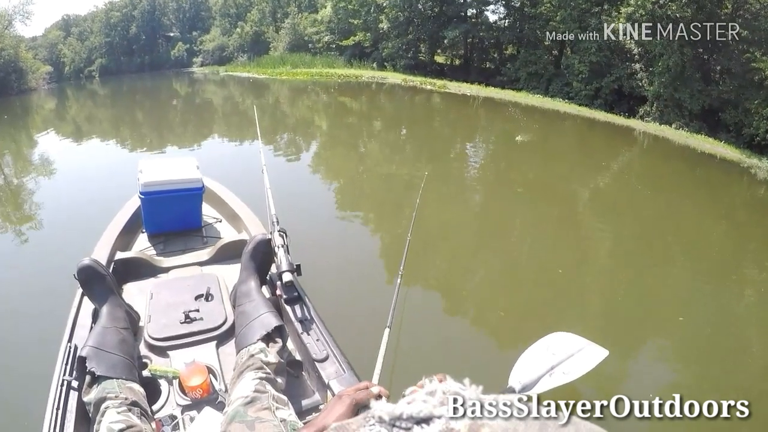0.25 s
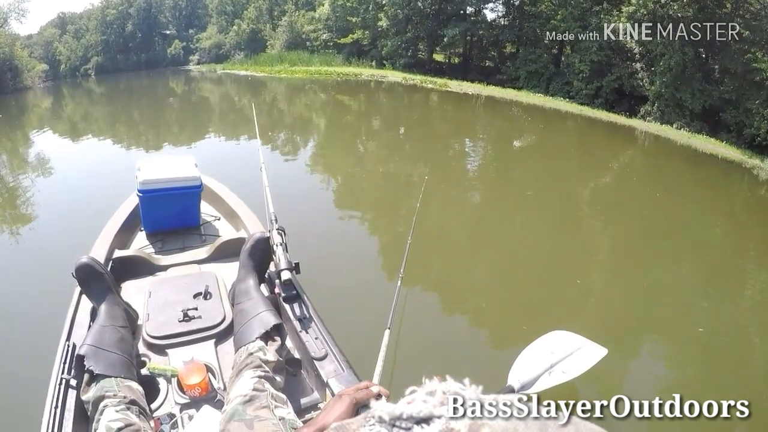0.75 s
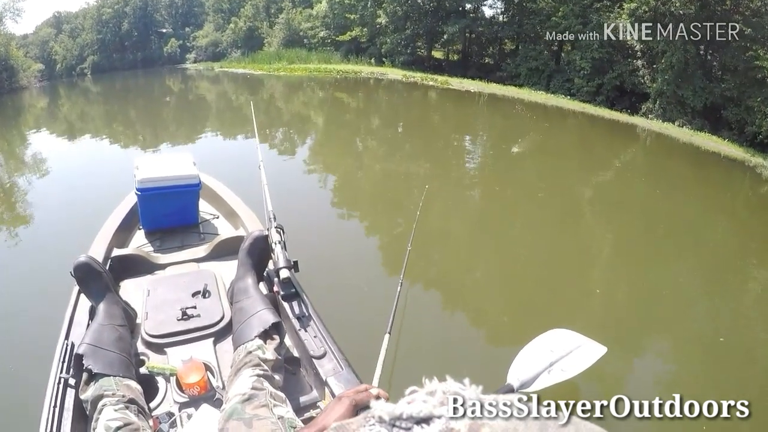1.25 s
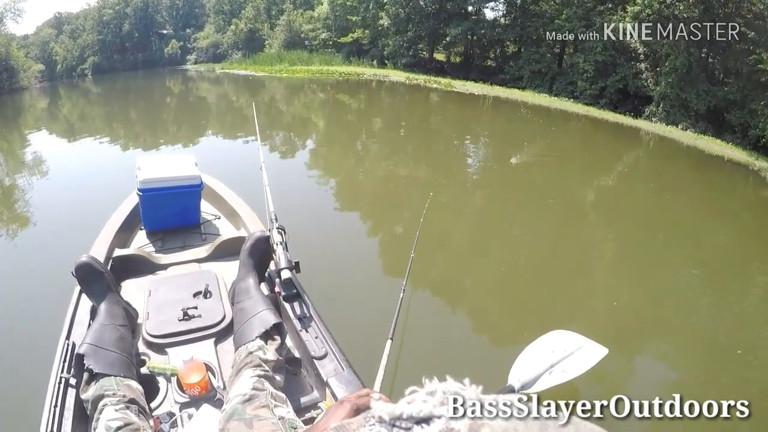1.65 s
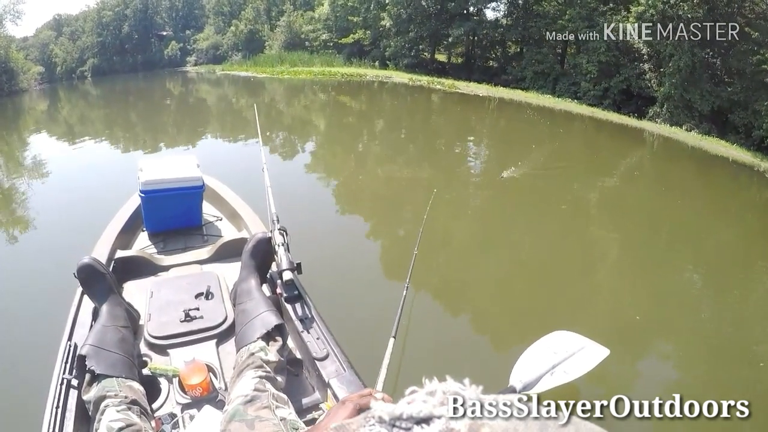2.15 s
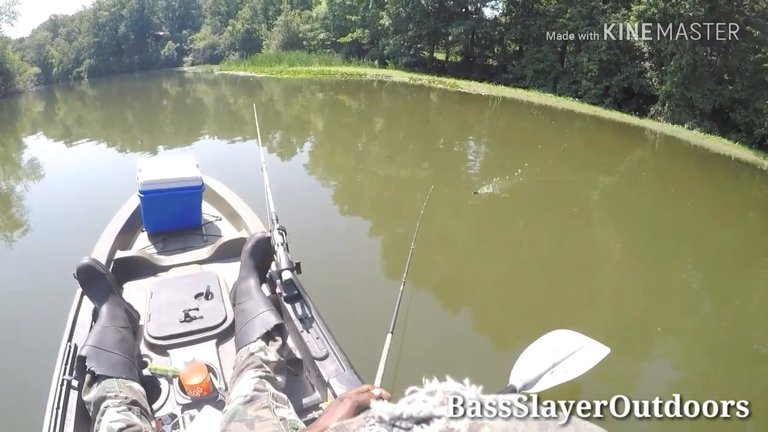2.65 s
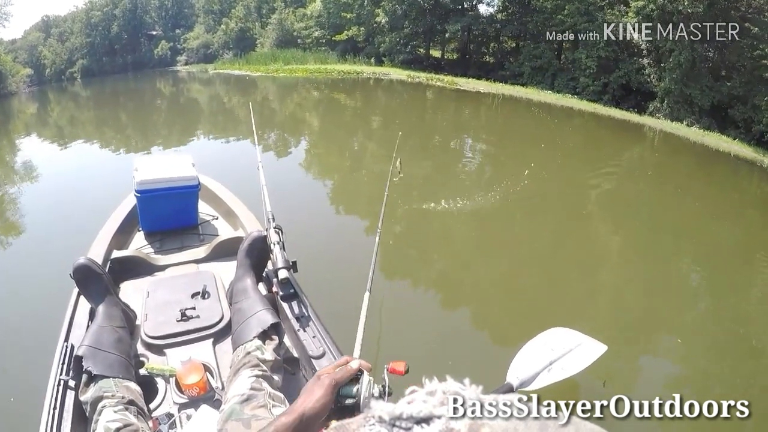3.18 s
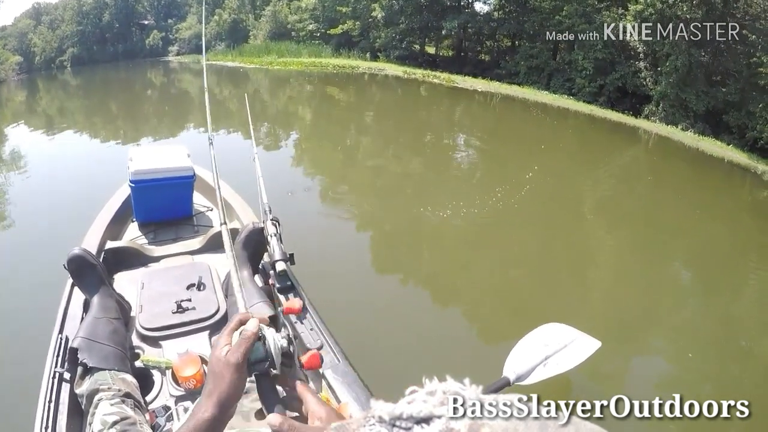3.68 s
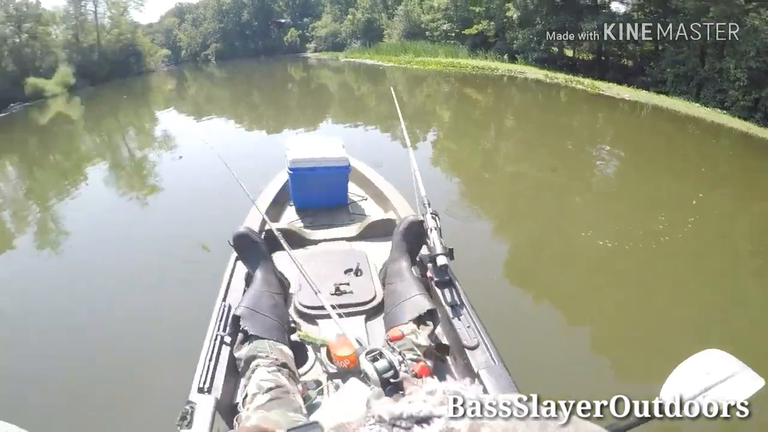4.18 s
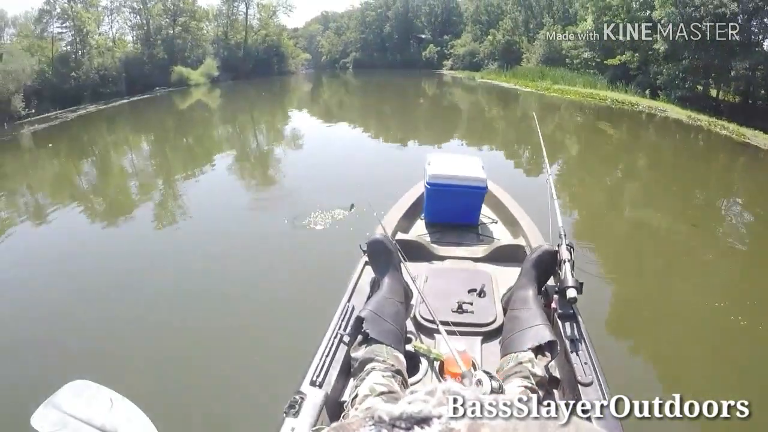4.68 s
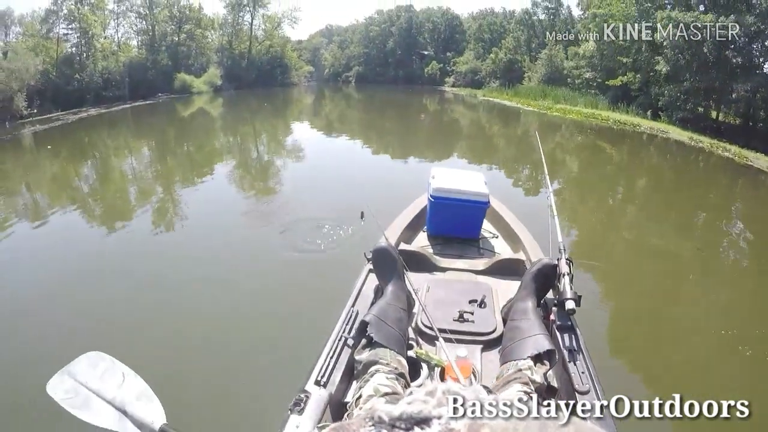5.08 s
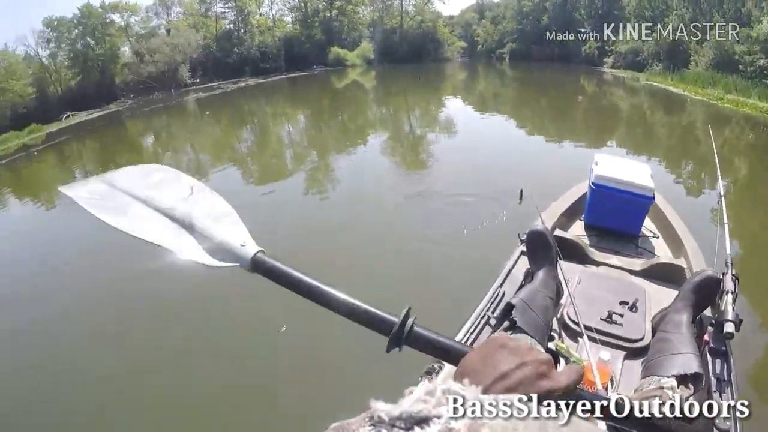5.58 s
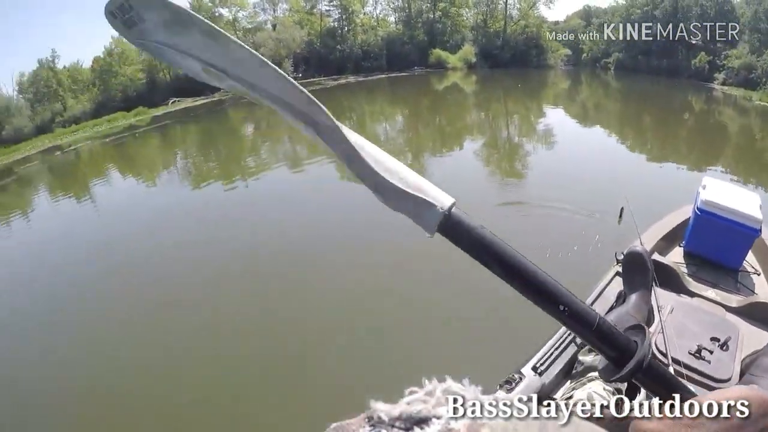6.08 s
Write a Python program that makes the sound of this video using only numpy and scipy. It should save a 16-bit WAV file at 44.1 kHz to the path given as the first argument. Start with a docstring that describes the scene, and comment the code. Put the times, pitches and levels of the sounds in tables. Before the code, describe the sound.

A propeller lure plops and sputters rapidly across calm water, then stops; tackle knocks on a plastic kayak and paddle drips patter over light wind rumble.

```python
"""A propeller lure is reeled across a river, close to one microphone on an angler's plastic kayak.
Each blade turn slaps the water (struck resonances, puffs of noise), throws up spray (tiny ringing bubbles)
and traps a bubble that plops upward in pitch. Then tackle and paddle knock and scrape on the hull, whose
modes ring, and drops patter. Cloth rustles in the seat, light wind rumbles on the microphone (coloured noise),
a small bird whistles on the bank (gliding sines), and insects and hiss lie far behind (steady noise)."""
import sys
import numpy as np
from scipy import signal
from scipy.fft import rfft, irfft
from scipy.io import wavfile

SR = 44100
rng = np.random.default_rng(int(sys.argv[2]) if len(sys.argv) > 2 else 0)


def voltage_ratio(decibels):
    """Convert decibels (scalar or array-like) to amplitude ratios, 20 dB per decade."""
    exponent = np.asarray(decibels, float) / 20
    return 10 ** exponent


def unload_wav(signal):
    """Save mono or channel-first audio to the path in sys.argv[1] as 16-bit WAV at rate SR, clipped to [-1, 1]."""
    wavfile.write(
        sys.argv[1],
        SR,
        np.round(np.clip(np.atleast_2d(signal).T, -1, 1) * 32767).astype(np.int16),
    )


N = 279153  # samples

# Far insects and hiss, their spectrum. Each row: frequency in Hz, relative density in dB per Hz.
AIR_SPECTRUM = [(1100, -28), (2300, -8), (3600, 0), (4400, -7.5), (8000, -10.5), (15500, -19.5)]
# Wind on the microphone. Each row: time in seconds, level in dB, flutter near 121 Hz in dB relative to it.
WIND_GUSTS = [(.45, -43.5, -8), (.75, -42.5, 3.5), (1.0, -43.5, 3), (1.4, -42, -6.5), (3.5, -46.5, -15),
              (4.5, -44, -9.5), (6.33, -45.5, -13)]
# Spectrum of the wind rumble. Each row: frequency in Hz, relative density in dB per Hz.
WIND_SPECTRUM = [(12, -21), (35, 6), (100, -1.5), (300, -15), (1500, -66)]
# Bird on the bank, one table a whistle. Each row: time in seconds, pitch in Hz, level in dB.
BIRD_WHISTLES = [
    [(1.36, 3870, -70), (1.49, 3870, -73)],
    [(3.688, 3690, -57), (3.705, 4000, -66.5), (3.82, 4050, -78)],
    [(4.622, 3000, -60), (4.635, 3640, -59), (4.66, 3780, -64), (4.72, 3680, -68)],
]
# Cloth and gear shifting in the seat. Each row: time in seconds, level in dB.
SEAT_RUSTLE = [(3.15, -59.5), (3.4, -56.5), (3.75, -53.5), (4.1, -56), (4.4, -50.5), (4.67, -61),
               (4.95, -54.5), (6.05, -60), (6.22, -55)]
# Spectrum of that rustle. Each row: frequency in Hz, relative density in dB per Hz.
CLOTH_SPECTRUM = [(200, -3.5), (1250, -1), (2050, -12.5), (6000, -31.5)]
# A short low hum from the hull. Each row: time in seconds, pitch in Hz, level in dB.
HULL_HUM = [(5.609, 80.6, -46.5), (5.69, 85.3, -39.5), (5.76, 81, -45.5)]
# A thin high squeak after the main knock. Each row: time in seconds, pitch in Hz, level in dB.
KNOCK_SQUEAK = [(4.583, 9200, -58), (4.62, 9250, -69)]
# Short stick-slip squeak of plastic. One row: start in seconds, length in seconds, slips per second, squeak in dB.
PLASTIC_CREAK = (3.908, .022, 655, -53)
# Modes of the hull. Each row: frequency in Hz, struck level in dB, undamped 60 dB decay in seconds.
HULL_MODES = [(400, -10, 0.2), (510, 7, 0.045), (600, 7, 0.078), (760, 4, 0.04), (935, 8, 0.03),
              (1200, 8, 0.046), (1545, -8, 0.06)]
# Soft bumps on the hull. Each row: start in seconds, peak in dB.
HULL_BUMPS = [(0.783, -32), (0.814, -33), (1.427, -28), (1.662, -33), (2.245, -35), (3.21, -35),
              (3.538, -35.5), (4.365, -36), (4.463, -33.5), (4.517, -36), (4.735, -31.5), (5.11, -38)]
# Rattling knocks and scrapes on the hull. Each row: start in seconds, peak of the ring in dB,
# treble in dB relative to it (before a common lift), fade time in seconds, hardness in dB per octave.
HULL_KNOCKS = [(3.748, -37, -40, 0.025, 0), (4.372, -45, -3, 0.07, -10), (4.441, -34, -24, 0.008, 3),
               (4.529, -18.5, -16, 0.026, -8.5), (4.567, -30, -19, 0.01, -3),
               (4.577, -31.5, -25, 0.014, -4), (4.617, -35, -12, 0.0051, -17),
               (5.93, -39, -10.5, 0.012, -8), (6.195, -36.5, -22, 0.044, 6.5)]
# Spectrum of the direct crack of a knock. Each row: frequency in Hz, relative density in dB per Hz.
CRACK_SPECTRUM = [(1000, -21), (2900, 0), (4200, -5), (7500, -16.5), (9400, -3), (13500, -25)]
# Water pattering off the lifted paddle. One row: start in seconds, end in seconds, level in dB.
PADDLE_PATTER = (6.03, 6.31, -64)
# Single drops from lure, line and paddle, and tackle that ticks alike.
# Each row: start in seconds, peak in dB, starting pitch in Hz.
SINGLE_DRIPS = [(1.677, -48, 3300), (1.7, -48, 3900), (2.652, -44, 850), (2.792, -48, 650),
                (3.07, -47.5, 730), (2.466, -46, 3400), (2.564, -44, 2900), (2.617, -46.5, 2500),
                (2.825, -46, 1690), (2.975, -47, 1600), (3.061, -44, 1550), (3.169, -49.5, 3600),
                (4.383, -47, 3400), (4.392, -38.5, 1700), (4.395, -43, 2500), (4.455, -43, 1800),
                (5.96, -45, 1400), (6.063, -45, 1130), (6.098, -45, 1110), (6.126, -46, 1070),
                (6.179, -48, 3700), (6.201, -50, 5600), (6.204, -42, 1300), (6.221, -44, 1400)]
# Fine spray and drips. Each row: time in seconds, level of the finest drops in dB.
SPRAY_LEVEL = [(0, -84.5), (2.2, -74.5), (3.07, -67.5), (3.13, -73), (4, -79), (4.2, -73), (4.6, -67),
               (4.7, -89), (6.33, -79)]
# Blade slaps and splashes. Each row: start in seconds, level in dB, bright part in dB relative to it.
BLADE_SLAPS = [(0.301, -42, -17), (0.6142, -41, -24), (0.764, -36.5, -16), (0.8814, -45, -22),
               (0.9418, -41, -30), (0.9996, -36.5, -25), (1.1937, -38, -13), (1.255, -44, -14),
               (1.7477, -35.5, -32), (1.919, -33.5, -8.5), (1.9886, -38, -25), (2.0458, -40, -16),
               (2.107, -38, -3.5), (2.1638, -38, -23), (2.3486, -37.5, -15), (2.4164, -38, -22),
               (2.45, -36, -4.5), (2.4955, -37.5, -5.5), (2.5425, -40.5, -29), (2.704, -40.5, -16),
               (2.858, -32.5, -9.5), (4.38, -39, -1.5)]
# Dull resonances of a slap. Each row: middle frequency in Hz, width per filter pass in Hz, level in dB.
DULL_MODES = [(3260, 620, 2), (5330, 700, -13)]
# Bright resonance of a slap. Each row: frequency in Hz, width per filter pass in Hz, level in dB.
BRIGHT_MODES = [(10000, 3000, 0)]
# Bubbles under the lure blade, one a turn. Each row: start in seconds, peak in dB before the level wobble.
LURE_PLOPS = [(0.015, -48.5), (0.0708, -47), (0.1231, -45), (0.1838, -47), (0.2447, -40), (0.3034, -39),
              (0.366, -48), (0.4248, -40), (0.4885, -42.5), (0.555, -42.5), (0.6146, -42.5), (0.7645, -38),
              (0.826, -38.5), (0.8832, -40.5), (0.9426, -37.5), (1.0027, -41), (1.0677, -42.5),
              (1.135, -49.5), (1.1948, -37), (1.2522, -37.5), (1.31, -39), (1.3764, -48), (1.4322, -39.5),
              (1.4894, -41.5), (1.5503, -44), (1.6171, -46.5), (1.685, -43), (1.8083, -36), (1.8647, -32.5),
              (1.9268, -46), (1.993, -38.5), (2.1077, -36), (2.1635, -36.5), (2.2882, -32.5), (2.346, -47),
              (2.4, -47.5), (2.4462, -41), (2.4924, -49), (2.546, -46), (2.5993, -41), (2.7017, -47),
              (2.754, -47), (2.8574, -37), (2.9105, -46), (2.96, -47.5), (3.006, -41), (3.058, -42)]
# Pitch glide of a bubble of middle size and loudness; it narrows once the lure runs faster.
# Each row: time in seconds, starting pitch in Hz, final pitch in Hz.
PLOP_GLIDE = [(2.3, 530, 1600), (2.34, 750, 1350), (3.06, 880, 1500)]


def evened(x):
    """Scales to rms 1."""
    return x / np.sqrt(np.mean(x ** 2) + 1e-20)


def curve(rows, t):
    """Columns of a table read at the times t."""
    s, *columns = np.transpose(rows)
    return [np.interp(t, s, column) for column in columns]


def add(mix, s, sound):
    """Mixes a sound in at s seconds."""
    part = mix[round(s * SR):][:len(sound)]
    part += sound[:len(part)]


def resonate(x, hz, width_hz):
    """One resonance of gain 1; the narrower it is, the longer it rings."""
    r = np.exp(-np.pi * width_hz / SR)
    return 2 * signal.lfilter([1 - r], [1, -r * np.exp(2j * np.pi * hz / SR)], x).real


def resonate_twice(x, hz, width_hz):
    """Two passes of one resonance, for steeper sides."""
    return resonate(resonate(x, hz, width_hz), hz, width_hz)


def coloured(x, points):
    """Filters x by a spectrum of (Hz, dB) points, joined along log frequency."""
    f, db = np.transpose(points)
    hz = np.fft.rfftfreq(len(x), 1 / SR)
    gain = voltage_ratio(np.interp(np.log(hz + 1), np.log(f + 1), db))
    return irfft(rfft(x) * gain, len(x))


def wander(rate_hz):
    """Slow chance of rms 1: noise through a low-pass."""
    return evened(resonate(rng.standard_normal(N), 0, rate_hz))


def whistle(rows):
    """Start and sound of a sine along a pitch and level curve, its level fluttering."""
    t = np.arange(rows[0][0], rows[-1][0], 1 / SR)
    hz, db = curve(rows, t)
    flutter = 1 + 0.66 * wander(74)[:len(t)]
    tone = np.sqrt(2) * np.sin(2 * np.pi * np.cumsum(hz) / SR)
    return t[0], voltage_ratio(db) * flutter * tone * signal.windows.tukey(len(t), .15)


def bubble(start_hz, end_hz, length, phase):
    """A short tone with a soft start and swell of peak 1; its rise in pitch flattens out."""
    bend = 1.5  # how early the rise flattens
    u = np.arange(0, 1, 1 / (length * SR))
    swell = u * (1 - u) ** 2.3
    # the integral of the pitch curve
    turns = length * (end_hz * u + (end_hz - start_hz) * ((1 - u) ** (bend + 1) - 1) / (bend + 1))
    return swell / swell.max() * np.sin(2 * np.pi * (turns + phase))


def droplets(low_hz, high_hz, per_s, cycles):
    """Tiny bubbles of ten sizes, each size falling at random moments; rms 1."""
    total = np.zeros(N)
    for hz in np.geomspace(low_hz, high_hz, 10):
        hits = rng.exponential(1, N) * (rng.random(N) < per_s / SR)
        total += signal.oaconvolve(hits, bubble(hz, 1.1 * hz, cycles / hz, 0))[:N]
    return evened(total)


def hull(push, damping=1, hard_db=0):
    """Rings the hull modes, peak 1; a harder contact favours the upper ones, and plastic swallows the treble."""
    ring = np.zeros(len(push))
    for hz, db, t60 in HULL_MODES:
        ring += voltage_ratio(db + hard_db * np.log2(hz)) * t60 * resonate(push, hz, damping * 2.2 / t60)
    ring = signal.lfilter(*signal.butter(2, 2600, fs=SR), ring)
    return ring / abs(ring).max()


def air():
    """Far insects and hiss: smooth coloured noise with a slight flicker."""
    level_db = -66.5
    return voltage_ratio(level_db + 1.0 * wander(30)) * evened(coloured(rng.standard_normal(N), AIR_SPECTRUM))


def wind():
    """Lumpy low noise on the microphone, with a flutter band whose share follows the gusts."""
    db, flutter_db = curve(WIND_GUSTS, np.arange(N) / SR)
    lumps = evened(coloured(rng.standard_normal(N), WIND_SPECTRUM)) * voltage_ratio(2.36 * wander(8.6))
    flutter = evened(resonate_twice(rng.standard_normal(N), 121.0, 102))
    return voltage_ratio(db) * (lumps + voltage_ratio(flutter_db) * flutter)


def bird():
    """Short whistles from the bank, nearly pure tones gliding in pitch."""
    out = np.zeros(N)
    for rows in BIRD_WHISTLES:
        add(out, *whistle(rows))
    return out


def rustle():
    """Grainy mid noise that follows the movement in the seat."""
    grains = rng.standard_normal(N) * voltage_ratio(2.06 * wander(42))
    return voltage_ratio(curve(SEAT_RUSTLE, np.arange(N) / SR)[0]) * evened(coloured(grains, CLOTH_SPECTRUM))


def hull_hum():
    """One low mode of the hull, heard as a brief fluttering tone."""
    return whistle(HULL_HUM)


def knock_squeak():
    """A thin high tone that fades as it sounds."""
    return whistle(KNOCK_SQUEAK)


def creak():
    """Nearly regular slips of uneven strength, dull in colour, over a bright rubbing hiss."""
    hiss_db = -61
    s, length, per_s, db = PLASTIC_CREAK
    t = np.arange(0, length, 1 / SR)
    slips = np.diff(np.floor(t * per_s), prepend=0) * rng.uniform(0.58, 1, len(t))
    squeak = voltage_ratio(db) * evened(resonate_twice(slips, 2300, 2400) + .05 * slips)
    hiss = voltage_ratio(hiss_db) * rng.standard_normal(len(t))
    return s, (squeak + hiss) * signal.windows.tukey(len(t))


def bumps():
    """A soft half-sine blow: long contact excites only the low modes, and the resting weight damps them."""
    contact_s = .001
    out, u = np.zeros(N), np.arange(3000) / SR / contact_s
    blow = hull(np.sin(np.pi * u) * (u < 1), damping=1.9)
    for s, db in HULL_BUMPS:
        add(out, s, voltage_ratio(db) * blow)
    return out


def knocks():
    """Gritty contact noise rings the hull modes; its treble is heard direct as a crack that dies sooner."""
    treble_lift_db = 11.5
    out, t = np.zeros(N), np.arange(6000) / SR
    noises = rng.standard_normal((len(HULL_KNOCKS), 2, len(t)))
    for (s, db, treble_db, length, hard_db), noise in zip(HULL_KNOCKS, noises):
        fade = np.exp(-t / max(length, .001)) * np.minimum(1000 * t, 1)
        crack = coloured(noise[1] * abs(noise[0]), CRACK_SPECTRUM) * fade ** 3.8
        damping = 1.15 + .4 * max(hard_db, 0)  # hard scrapes are pressed down and ring less
        ring = hull(noise[0] * noise[1] ** 2 * fade, damping, hard_db)
        add(out, s, voltage_ratio(db) * (ring + voltage_ratio(treble_db + treble_lift_db) * crack / abs(crack).max()))
    return out


def patter():
    """Dense small drops of many pitches off the lifted paddle."""
    start, end, db = PADDLE_PATTER
    t = np.arange(N) / SR
    return voltage_ratio(db) * ((t > start) & (t < end)) * droplets(1500, 13000, 90, 8.5)


def drips():
    """Each drop rings briefly at its own pitch, rising slightly."""
    cycles, rise = 7.5, 1.05  # length in cycles of the starting pitch, pitch ratio end to start
    out = np.zeros(N)
    for (s, db, hz), phase in zip(SINGLE_DRIPS, rng.random(len(SINGLE_DRIPS))):
        add(out, s, voltage_ratio(db) * bubble(hz, rise * hz, cycles / hz, phase))
    return out


def spray():
    """Fine and middle droplets thrown up in a clump by each blade turn, and larger bubbles where they land."""
    turns = np.zeros(N)
    turns[[round(s * SR) for s, _ in LURE_PLOPS]] = 1
    clump = 0.11 + signal.lfilter([1], [1, -np.exp(-1 / (0.011 * SR))], turns)  # dies away in 11 ms
    fine = droplets(8900, 12000, 300 * clump, 18)
    middle = 1.37 * droplets(2700, 5600, 150 + 60 * clump, 11)
    landing = 1.84 * droplets(893, 2245, 4 + 40 * clump, 8.1)
    return voltage_ratio(curve(SPRAY_LEVEL, np.arange(N) / SR)[0]) * (fine + middle + landing)


def splash_colour(x, modes, shift):
    """The short, steep resonances that every slap shares, shifted together in pitch."""
    return sum(voltage_ratio(db) * resonate_twice(x, shift * hz, width) for hz, width, db in modes)


def slaps():
    """A blow and a puff of noise ring the dull resonances, the puff alone the bright; early turns tick faintly."""
    tick_db, tick_bright_db, ticks_end_s = -48.5, -20, 2.42
    tick_lead_s = .005  # the blade enters just before its bubble forms
    spread = .04  # largest share by which the dull colour shifts
    out, t = np.zeros(N), np.arange(600) / SR
    ticks = [(s - tick_lead_s, tick_db, tick_bright_db) for s, _ in LURE_PLOPS if s < ticks_end_s]
    strokes = list(BLADE_SLAPS) + ticks
    for (s, db, bright_db), noise in zip(strokes, rng.standard_normal((len(strokes), len(t)))):
        puff = noise * t * np.exp(-t / 0.00079)
        blow = 1. * (t == 0)
        shift = 1 + spread * np.tanh(noise[0])
        dull = splash_colour(blow + .5 * puff / np.linalg.norm(puff), DULL_MODES, shift)
        bright = splash_colour(puff, BRIGHT_MODES, 1)
        share = min(voltage_ratio(bright_db), 1)
        add(out, s, voltage_ratio(db) * ((1 - share) * dull / abs(dull).max() + share * bright / abs(bright).max()))
    return out


def plops():
    """Each bubble rings for a few cycles while it rises to the surface, so its pitch climbs."""
    middle_db, shrink_per_db = -42, .014  # louder bubbles are larger, so lower
    size_spread, length_s = .1, 0.015  # random share of pitch either way, length before a random factor
    wobble_db, wobble_hz = 2.4, 150  # the level of the bubbles flutters
    out = np.zeros(N)
    for (s, db), (phase, low, high, long) in zip(LURE_PLOPS, rng.random((len(LURE_PLOPS), 4))):
        start_hz, end_hz = np.array(curve(PLOP_GLIDE, s)) * np.exp(-shrink_per_db * (db - middle_db))
        start_hz *= 1 + size_spread * (2 * low - 1)
        end_hz *= 1 + size_spread * (2 * high - 1)
        add(out, s, voltage_ratio(db) * bubble(start_hz, end_hz, length_s * (.72 + .65 * long), phase))
    return out * voltage_ratio(wobble_db * wander(wobble_hz))


def scene():
    """Everything at one microphone, as a single channel."""
    background = air() + wind() + bird() + rustle()
    kayak = bumps() + knocks()
    for s, sound in (hull_hum(), knock_squeak(), creak()):
        add(kayak, s, sound)
    water = patter() + drips() + spray() + slaps() + plops()
    return (background + kayak + water)[None]


def top_cut(x):
    """Nothing passes above the cut-off."""
    return signal.sosfilt(signal.butter(12, 15500, fs=SR, output="sos"), x)


def record(dry):
    """The finished mix as it is kept."""
    return top_cut(dry)


dry = scene()
out = record(dry)
unload_wav(out)
```